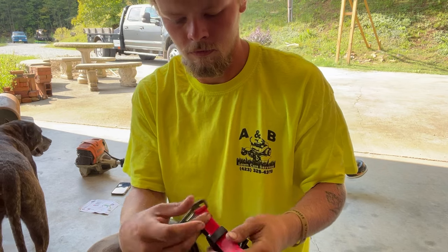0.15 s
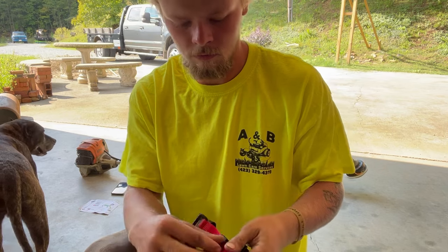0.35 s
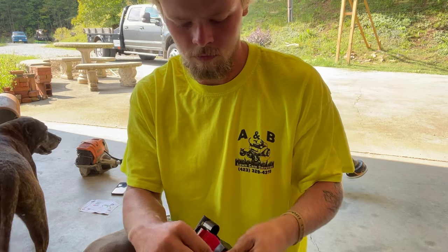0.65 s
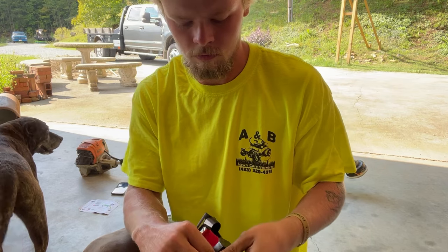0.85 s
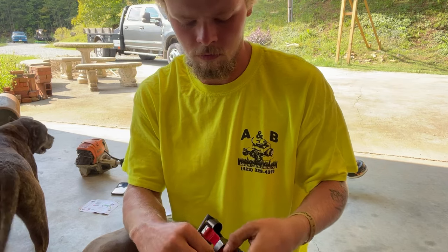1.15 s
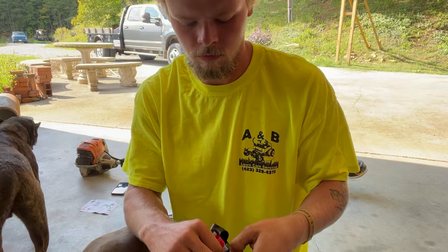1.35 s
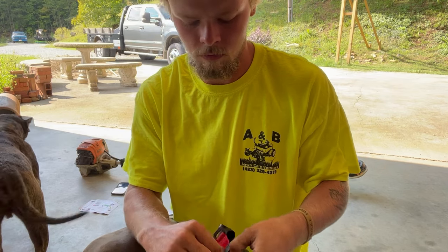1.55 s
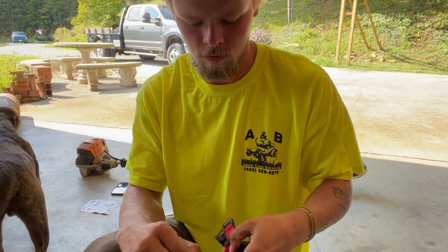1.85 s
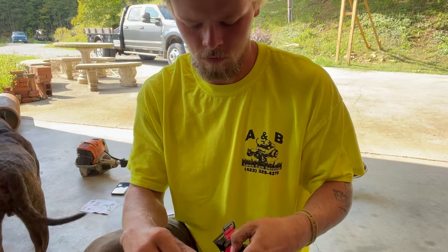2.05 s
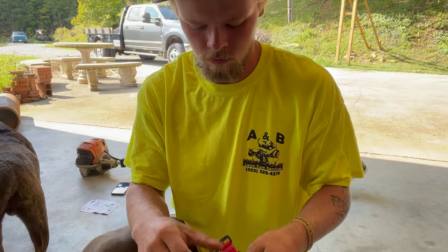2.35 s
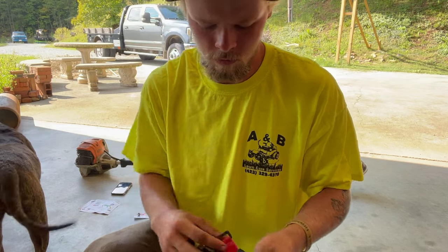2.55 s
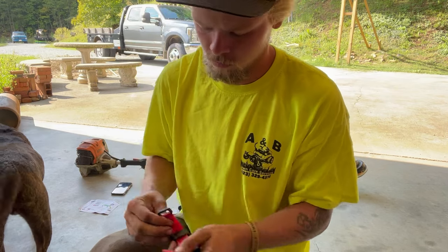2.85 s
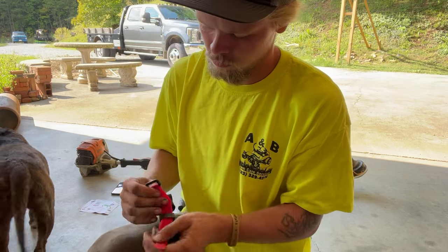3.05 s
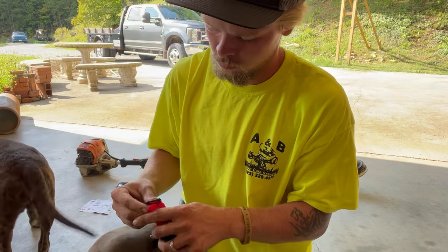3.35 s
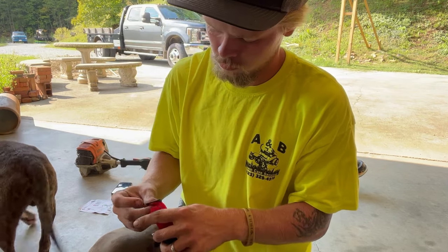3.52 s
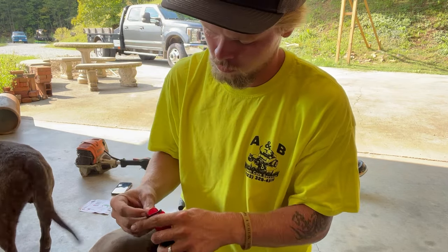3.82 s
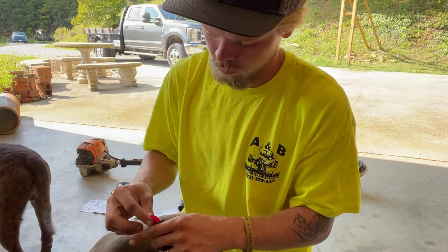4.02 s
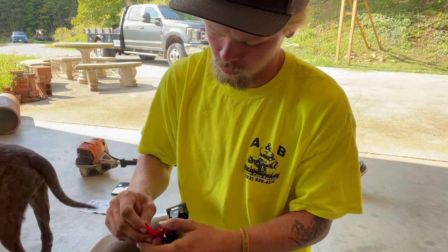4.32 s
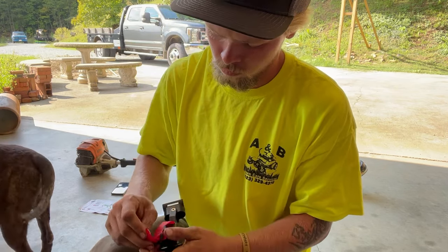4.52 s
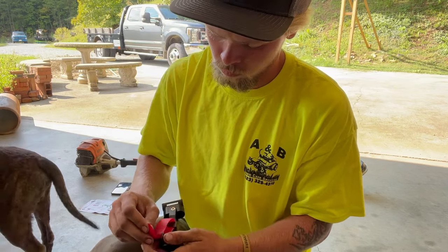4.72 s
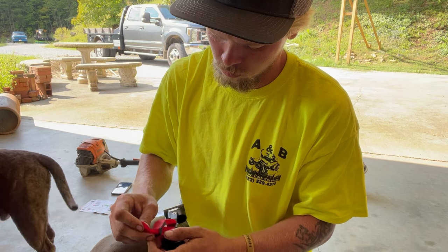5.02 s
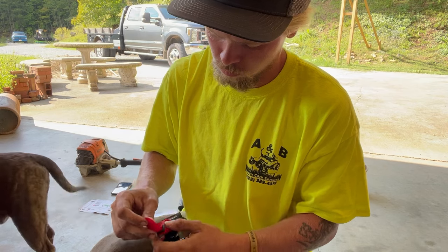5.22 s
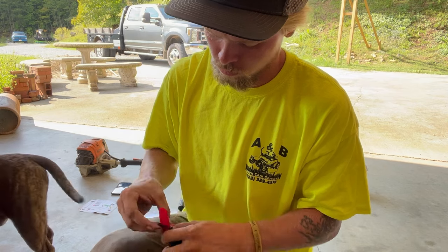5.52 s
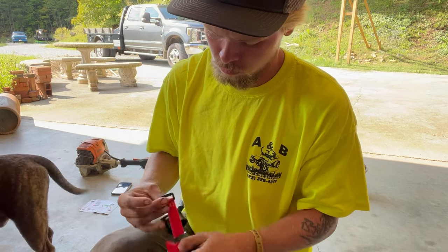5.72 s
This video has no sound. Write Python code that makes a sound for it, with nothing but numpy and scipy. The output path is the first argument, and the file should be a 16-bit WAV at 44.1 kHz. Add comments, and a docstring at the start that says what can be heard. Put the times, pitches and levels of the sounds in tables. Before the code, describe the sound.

Hands work a hook-and-loop strap through a plastic buckle about an arm's length from a phone microphone. Faint ticks and rubs come first, then a loud short rip with buckle rattle, a hard plastic click, softer rasps and a final crackling cluster. A low fan-like hum and faint hiss continue beneath in an open concrete garage.

```python
"""Open garage: hands thread a hook-and-loop strap through a plastic buckle, an arm's length from a two-port phone.
Hooks snap free singly (tick plus rattle) and in rips (dense noise bursts through webbing resonances).
The buckle knocks (decaying sine inside a noisy clack) and rings along during the long rip.
Fan and compressor hum and beat (steady cosines) over rumble and hiss (shaped noise); random echoes form the room."""
import sys
import numpy as np
from scipy import signal
from scipy.fft import rfft, irfft
from scipy.io import wavfile
from scipy.ndimage import uniform_filter1d, map_coordinates

SR = 44100
rng = np.random.default_rng(int(sys.argv[2]) if len(sys.argv) > 2 else 0)


def unload_audio(sound):
    """Save the sound as a 16-bit wav file, at the path given as the first command line argument."""
    columns = np.transpose(np.atleast_2d(sound))
    # keep every value between -1 and 1, then stretch to whole-number steps
    steps = np.round(np.clip(columns, -1, 1) * 32767)
    wavfile.write(sys.argv[1], SR, steps.astype(np.int16))


N = 259308

# Rumble and hiss spectrum: hz, density_db_per_hz, port_likeness (-1 to 1)
AIR_SPECTRUM = [(24, -104, 0.8), (34.2, -84, 0.97), (43, -75, .97), (80, -72.5, 0.68), (154, -77.5, 0.72),
                (392, -84.5, 0.057), (1380, -98.5, -.2), (1700, -94, -0.43), (1820, -102, -0.39),
                (2420, -99, -0.019), (4740, -89, -0.053), (6770, -89.5, -0.047), (7870, -90, 0.74),
                (9500, -98, 0.82), (10800, -104, 1), (12100, -105, 1), (15200, -122, 1)]
# Slow swell of the treble hiss: time_s, swell_db
HISS_SWELL = [(0, -2.5), (1.5, -2), (3, -0.7), (4.5, -1.56), (5.88, -0.8)]
# Hum lines: shaft_order, mains_order, left_rms_db, right_rms_db
HUM_LINES = [(1, 0, -61, -60), (2, 0, -61.5, -57), (3, 0, -52, -49.5), (0, 1, -54.5, -57),
             (1, 1, -66.5, -66), (2, 1, -66, -62.5), (0, 2, -75, -66.5), (-2, 2, -72, -67.5)]
# Left port lag as the hands shift: time_s, lag_us
LEFT_LAG = [(0, 147), (2.3, 87), (2.6, 35), (5.88, 14)]
# Buckle knocks, pitched by finger grip: start_s, peak_db, ring_hz, ring_share (0-1)
BUCKLE_KNOCKS = [(0.243, -46, 1300, 0.05), (1.606, -41, 1970, 0.5), (1.633, -39, 1980, 0.7),
                 (1.654, -28.5, 2030, 0.8), (1.7, -36, 2000, 0.8), (1.743, -35, 1150, 0.46),
                 (1.748, -37, 1110, .8), (1.753, -31, 1090, 1), (1.763, -36, 1020, 0.8),
                 (1.774, -27, 1160, 0.93), (1.889, -36, 1190, 0.45), (1.896, -31.5, 1450, 1),
                 (2.1415, -38, 1390, 0.77), (2.274, -40, 1630, 0.28), (2.317, -40.5, 1200, 0.34),
                 (2.681, -41, 2110, 0.4), (2.856, -37, 1700, 0.35), (2.88, -40, 1100, 0.1),
                 (2.8862, -28.5, 1700, 0.4), (2.8936, -27.5, 1050, 0.22), (2.896, -23.5, 1100, 0.2),
                 (2.9018, -31, 2000, 0.05), (2.978, -43, 950, 0.47), (3.005, -35, 530, 0.24),
                 (3.024, -40, 711, 0.4), (3.052, -40.5, 603, 0.3), (3.641, -41, 1020, 0.06),
                 (4.255, -34, 2460, 0.1), (4.276, -48, 1860, 0.4), (5.472, -34, 1660, 0.49),
                 (5.571, -38, 1000, .2), (5.576, -37, 900, 0.4), (5.582, -46, 786, .8),
                 (5.587, -38.5, 750, 1), (5.624, -36, 1220, 0.53), (5.628, -33.5, 486, 0.57),
                 (5.644, -25.5, 1480, 0.13), (5.647, -35, 2540, 0.2), (5.65, -34, 1800, 0)]
# Buckle resonances on the taut strap: hz, width_hz
TAUT_RESONANCES = [(400, 250), (1100, 260), (2050, 800)]
# Their levels during the long rip: time_s, low_db, middle_db, high_db
TAUT_LEVELS = [(1.645, -80, -80, -70), (1.654, -56, -60, -47), (1.68, -55, -58, -48), (1.70, -49, -54, -47),
               (1.73, -48, -52, -47), (1.755, -53, -48, -48), (1.776, -51, -50, -47),
               (1.785, -54, -70, -58), (1.83, -56, -75, -62), (1.88, -66, -80, -70), (1.92, -85, -90, -85)]
# Webbing resonances, one list each for bass, mid, treble: hz, width_hz, level_db
WEBBING_RESONANCES = [
    [(412, 300, 0.5), (1100, 1240, 3.5), (1970, 3100, 3.5)],
    [(3100, 2800, -8), (4780, 3200, 2.5), (6770, 4500, -3)],
    [(8330, 3400, 5), (10650, 2300, 4), (12530, 2160, 3.5), (13540, 890, -3)],
]
# Single hooks letting go: start_s, treble_peak_db, mid_minus_treble_db
HOOK_SNAPS = [(0.06, -39, -20), (0.1224, -32, -22), (0.247, -30, -8), (0.2846, -43.5, -13),
              (0.3168, -38, -4), (0.326, -34.5, -3), (0.6473, -48, -7), (0.7362, -49, -5), (0.757, -37, -5),
              (0.9495, -31.5, -16), (1.115, -27.5, -6), (1.1293, -41, -8), (1.2353, -33.5, -2),
              (1.2472, -35, 0), (1.2741, -37, -7), (1.2924, -29, -7), (1.303, -30.5, -2.5),
              (1.3347, -28.5, -9), (1.3374, -30, -12), (1.3517, -35, -1), (1.421, -30, -6), (1.43, -41, -7),
              (1.4425, -21, -2), (1.498, -39, -10), (1.507, -36, 8.5), (1.594, -37, -10), (1.5975, -22, -6),
              (1.604, -24, -5), (1.6055, -18, -4), (1.61, -27, -4), (1.632, -24, -2), (1.6422, -26, -5),
              (1.6528, -20, -5), (1.654, -15, -2), (1.657, -19, -4), (1.661, -21, -7), (1.667, -17, -3),
              (1.669, -18, -4), (1.6725, -20, -2), (1.676, -20, -4), (1.6808, -22, -3), (1.6865, -20, -2),
              (1.6955, -19, -2), (1.699, -18, -4), (1.718, -19, -2), (1.7245, -14, -5), (1.7315, -20, -1),
              (1.7388, -19, -3), (1.753, -14, -8), (1.7626, -25, -9), (1.7735, -16, -7), (1.889, -22, 0),
              (1.8955, -18.5, -1), (1.8985, -25, -14), (2.2712, -39, 7.5), (2.7216, -35, 2),
              (2.7819, -42, -7), (2.8603, -32.5, -7), (2.8815, -22, -18), (2.8923, -27, -12),
              (2.896, -31, 1), (2.9125, -37, 2), (3.002, -35, -12), (3.006, -33, -3), (3.0085, -30.5, 1.5),
              (3.0266, -37, -7), (3.1083, -42, -8), (3.3646, -33.5, -4), (3.6148, -35, -19),
              (3.641, -31, -14), (3.7758, -35, -10), (3.81, -39, -13), (3.841, -34, -10),
              (3.9312, -37, -13), (4.189, -33.5, -6), (4.259, -24.5, -2.5), (4.274, -26, -6.5),
              (4.295, -23.5, -12), (4.4778, -41, -1), (4.6382, -46, -1), (4.752, -39, -4),
              (4.9855, -45, 10.5), (5.0173, -38, -17), (5.1502, -42, -8), (5.1636, -35, -17),
              (5.25, -47, 9), (5.4648, -34, -12), (5.4716, -30, -5), (5.5704, -35, -3), (5.576, -33, -3),
              (5.5823, -23, -14), (5.5803, -33, -6), (5.5875, -26, -11), (5.5901, -20.5, -16),
              (5.591, -25, -15), (5.6043, -19.5, -18), (5.6, -30, -3), (5.611, -26, -2.5),
              (5.618, -28, -10), (5.6232, -28, -11), (5.626, -30, 2), (5.6312, -28, -10), (5.636, -30, -2)]
# Strap torn or rubbed: full_level_s, rise_s, hold_s, fall_s, treble_db, mid_minus_treble_db,
# bass_minus_treble_db, graininess_db
STRAP_STROKES = [(0.123, 0.26, .002, 0.34, -59.5, -16, -6.5, 4),
                 (0.24, 0.018, .002, 0.013, -51.5, -16, -0.5, 7),
                 (0.323, .06, .002, 0.031, -67, -7, 0, 6.5), (0.647, 0.057, .002, 0.017, -56.5, 0, -4.5, 8),
                 (0.755, 0.082, .002, 0.019, -52.5, 3.5, -2.5, 7), (0.94, .055, .004, 0.091, -58, 1, -7, 7),
                 (1.245, 0.043, 0.16, 0.19, -61, 1.5, -23, 6),
                 (1.604, 0.0063, 0.01, 0.025, -40.5, 8, -16, 7.5),
                 (1.653, 0.003, 0.124, .006, -32.5, 0, -14, 4.5),
                 (1.893, 0.0094, 0.0074, 0.0099, -39, 4, -3.5, 4.5),
                 (2.04, .05, .002, .03, -65, 11.5, -10, 5), (2.24, .02, 0.064, .03, -60.5, -3, -9, 8),
                 (2.797, .03, .002, 0.093, -64.5, 1, 1.5, 8),
                 (2.887, 0.037, .002, 0.032, -48, -1, 4.5, 8.5),
                 (3.005, 0.017, 0.004, 0.043, -44.5, -7, -4, 7), (3.06, .03, 0.047, .03, -56, -4, -7.5, 4),
                 (3.17, .08, .002, 0.11, -53, -10, -13, -1),
                 (3.361, 0.038, .002, 0.012, -59.5, 6.5, 0.5, 10), (3.638, 0.04, .008, .07, -64, -8, 0, 9),
                 (3.752, .05, 0.058, .03, -65, -7, -7, 8), (3.847, 0.033, 0.0018, 0.015, -59, -9, 6, 2),
                 (3.934, 0.092, .002, .035, -58, -14, -7, 7), (4.044, .03, 0.043, 0.09, -51.5, -5, -10, 1),
                 (4.194, .015, .01, 0.046, -52.5, -6, -15, 2),
                 (4.256, 0.026, 0.049, 0.032, -54.5, -4.5, -1, 9),
                 (4.675, 0.037, 0.047, .03, -47, -14, -22, 1),
                 (4.737, 0.042, 0.028, 0.02, -44.5, -5.5, -21, -3),
                 (5.15, 0.022, .004, 0.4, -57, -7, -8.5, 11),
                 (5.474, 0.015, 0.0018, 0.012, -52.5, 5, 9.5, 3.5),
                 (5.571, .008, 0.012, 0.016, -47, -7, -4, 2.5),
                 (5.591, 0.016, 0.038, 0.034, -41.5, -4.5, -8, 2),
                 (5.783, 0.16, .002, 0.034, -62.5, -13, -1, 7)]

SHAFT_HZ, MAINS_HZ, PUMP_HZ, PUMP_RMS_DB = 42.76, 119.84, 59.09, -57
IN_STEP_S = 0.048  # all hum lines crest together here
GARAGE_T60_S, GARAGE_DB = 0.33, -9
SCATTER_T60_S, SCATTER_DB, ECHO_PATTERNS, WEIGHT_STEPS_PER_S = 0.008, -10, 4, 40
KNOCK_T60_S, LOOSE_EXTRA_T60_S = 0.011, 0.008  # a loose grip rings longer
GRIT_DB, CLACK_WIDTH_RATIO = -24, 2.5
TUGS_PER_S, TUG_SIZE_DB = 1500, 1.5
# faint hooks at random moments
STRAYS_PER_S, STRAY_MIN_DB, STRAY_SCATTER_DB, STRAY_MID_DB = 14, -48, 2.5, -3
TICK_DECAY_S, RATTLE_DB, RATTLE_T60_S = 0.0001, -21, 0.011
# stronger, longer rattle while the strap is torn open
TORN_START_S, TORN_END_S = 1.59, 1.79
BUNCH_MID_DB, BUNCH_TREBLE_DB, BUNCH_T60_S = -7, -14, 0.014
TUNE_SCATTER_DB = 0.5  # each snap finds the webbing bent a little differently
SNAP_TOP_HZ, SNAP_TOP_WIDTH_HZ, SNAP_TOP_DB = 14050, 1700, 0.89
HOOKS_PER_S, HOOK_T30_S, SHARED_SIZE = 4000, 0.0009, 0.7
EDGE_DB = 20  # level change over each rise and fall
AFTER_DB, AFTER_S = -16.5, 0.15  # crackle after a stroke: start level, time to drop EDGE_DB
DULL_BELOW_DB, DULL_DB_PER_DB, DULL_MIN_DB, DULL_HZ = -38, 4.5, -4, 12000  # soft strokes lose top
PORT_SPLIT_HZ, PORT_ALIGN_HZ, PORT_DELAY_S, BALANCE_DB = 7200, 11250, 155e-6, -1.7
TOP_HZ = 16100


def undb(db):
    """Amplitude factor from dB."""
    return 10 ** (np.asarray(db) / 20)


def unit(x):
    """Scale to rms 1."""
    return x / np.sqrt(np.mean(x ** 2))


def band(x, hz, width_hz):
    """Resonance applied twice, for steep skirts; width is per pass."""
    b, a = signal.iirpeak(hz, hz / width_hz, fs=SR)
    return signal.lfilter(b, a, signal.lfilter(b, a, x))


def ring_down(t, t60_s):
    """Exponential decay, down to 1/1000 at t60_s."""
    return np.exp(-np.log(1000) * t / t60_s)


def fade(x, fall_s):
    """Smear with an exponential tail that falls to 1/1000 in fall_s."""
    return signal.lfilter([1], [1, -ring_down(1 / SR, fall_s)], x)


def walk(rate_hz):
    """Random levels held 1 / rate_hz seconds, smoothed twice and scaled by 0.15."""
    k = int(SR / rate_hz)
    steps = np.repeat(rng.standard_normal(N // k + 1), k)
    return 0.15 * uniform_filter1d(uniform_filter1d(steps, k), k)[:N]


def air():
    """Machine rumble, alike at both ports, and a smooth treble hiss that swells slowly."""
    hz, density_db, likeness = np.transpose(AIR_SPECTRUM)
    log_f = np.log(np.fft.rfftfreq(N, 1 / SR) + 1)
    gain = undb(np.interp(log_f, np.log(hz), density_db, left=-130)) * np.sqrt(SR / 2)
    c = np.clip(np.interp(log_f, np.log(hz), likeness), -0.9, 1)
    # shared and opposed parts set the correlation of the ports
    mid, side = rfft(rng.standard_normal((2, N))) * gain * np.sqrt([(1 + c) / 2, (1 - c) / 2])
    pair = np.array([mid + side, mid - side])
    treble = 1 / (1 + (2500 / np.exp(log_f)) ** 6)
    swell_db = np.interp(np.arange(N) / SR, *np.transpose(HISS_SWELL)) + 0.41 * walk(2.7)
    return irfft(pair * (1 - treble), N) + undb(swell_db) * irfft(pair * treble, N)


def hum():
    """Compressor tone, fan shaft orders, mains buzz and sums; third order beats with buzz at 8.4 Hz."""
    t = np.arange(N) / SR - IN_STEP_S
    out = undb([[PUMP_RMS_DB], [PUMP_RMS_DB]]) * np.cos(2 * np.pi * PUMP_HZ * t)
    for shaft, mains, *port_db in HUM_LINES:
        waver = undb(0.59 * walk(1.2) * (shaft != 0))
        line_hz = shaft * SHAFT_HZ + mains * MAINS_HZ
        out = out + undb(port_db)[:, None] * waver * np.cos(2 * np.pi * line_hz * t)
    return np.sqrt(2) * out  # rms to peak


def echoes(x, t60_s, db):
    """Random reflections dying away, unrelated at each port."""
    t = np.arange(int(2 * t60_s * SR)) / SR
    echo = rng.standard_normal((2, len(t))) * ring_down(t, t60_s) * (t > 0.0005)
    echo = undb(db) * echo / np.sqrt(np.sum(echo ** 2, axis=1, keepdims=True))
    return signal.fftconvolve(x[None], echo)[:, :N]


def garage(x):
    """Quick diffuse scatter, random echo patterns blended by drifting weights, then the concrete bay's tail."""
    weights = np.array([walk(WEIGHT_STEPS_PER_S) for _ in range(ECHO_PATTERNS)])
    weights /= np.sqrt(np.sum(weights ** 2, axis=0))
    scatter = sum(echoes(x * w, SCATTER_T60_S, SCATTER_DB) for w in weights)
    return scatter + echoes(x, GARAGE_T60_S, GARAGE_DB)


def knocks():
    """Hollow plastic: a short dull ring inside a wide clack; a loose grip lets the ring through."""
    out, t = np.zeros(N + 4000), np.arange(4000) / SR
    noises = rng.standard_normal((len(BUCKLE_KNOCKS), 4000))
    for (start_s, peak_db, hz, share), noise in zip(BUCKLE_KNOCKS, noises):
        decay = ring_down(t, KNOCK_T60_S + LOOSE_EXTRA_T60_S * share)
        push = (t == 0) + undb(GRIT_DB) * noise * decay
        clack = band(push, hz, CLACK_WIDTH_RATIO * hz)
        share = np.clip(share, 0, 1)
        ring = np.sin(2 * np.pi * hz * t) * decay * (1 - np.exp(-t / 0.00016))
        hit = share * ring + (1 - share) * clack / abs(clack).max()
        i = int(start_s * SR)
        out[i:i + 4000] += undb(peak_db) * hit / abs(hit).max()
    return out[:N]


def taut():
    """Uneven tugs of the tearing hooks shake the buckle resonances."""
    t, (time_s, *levels) = np.arange(N) / SR, np.transpose(TAUT_LEVELS)
    out = 0
    for (hz, width_hz), level_db in zip(TAUT_RESONANCES, levels):
        tugs = (rng.random(N) < TUGS_PER_S / SR) * rng.standard_normal(N)
        tugs = tugs * undb(TUG_SIZE_DB * rng.exponential(size=N))
        level = undb(np.interp(t, time_s, level_db, left=-120, right=-120))
        out = out + level * unit(band(tugs, hz, width_hz))
    return out


def strays():
    """Extra snap rows at random moments, with exponentially scattered dB levels."""
    place, size = rng.random((int(STRAYS_PER_S * N / SR), 2)).T
    peak_db = STRAY_MIN_DB - STRAY_SCATTER_DB * np.log(1 - size)
    return [(s, db, STRAY_MID_DB) for s, db in zip(place * N / SR, peak_db)]


def strike(push, modes, noise):
    """Shake slightly detuned resonances of alternating sign; peak 1."""
    out = 0
    for k, (hz, width_hz, db) in enumerate(modes):
        bent_hz = hz * undb(TUNE_SCATTER_DB * noise[-1 - k])
        out = out + undb(db) * band(push, bent_hz, width_hz) * (-1) ** k
    return out / abs(out).max()


def snaps():
    """Each freed hook gives a needle-sharp tick and a weaker rattle, in treble and mid."""
    out, t = np.zeros(N + 4000), np.arange(4000) / SR
    rows = list(HOOK_SNAPS) + strays()
    # a single hook reaches higher than the webbing rings
    treble_modes = WEBBING_RESONANCES[2][:-1] + [(SNAP_TOP_HZ, SNAP_TOP_WIDTH_HZ, SNAP_TOP_DB)]
    for (start_s, peak_db, mid_db), noise in zip(rows, rng.standard_normal((len(rows), 4000))):
        tick = (t == 0) + 0.2 * noise * np.exp(-t / TICK_DECAY_S)
        mid_rattle_db, treble_rattle_db, t60_s = RATTLE_DB, RATTLE_DB, RATTLE_T60_S
        if TORN_START_S < start_s < TORN_END_S:
            mid_rattle_db, treble_rattle_db, t60_s = BUNCH_MID_DB, BUNCH_TREBLE_DB, BUNCH_T60_S
        rattle = noise * ring_down(t, t60_s)
        mid = strike(tick + undb(mid_rattle_db) * rattle, WEBBING_RESONANCES[1], noise)
        treble = strike(tick + undb(treble_rattle_db) * rattle, treble_modes, noise)
        i = int(start_s * SR)
        out[i:i + 4000] += undb(peak_db) * (treble + undb(mid_db) * mid)
    return out[:N]


def rips():
    """Dense hook releases of very uneven size; each shakes the webbing resonances in its own way."""
    t, power, grain_db = np.arange(N) / SR, np.zeros((3, N)), np.zeros(N)
    for full_s, rise_s, hold_s, fall_s, treble_db, mid_db, bass_db, grain in STRAP_STROKES:
        early = full_s - t
        late = t - full_s - max(hold_s, 0)
        slope = np.maximum(early / max(rise_s, 0.002), late / max(fall_s, 0.002))
        shape_db = -EDGE_DB * np.maximum(slope, 0)
        # loosened hooks crackle on; doubled dB gives power
        after = (late > 0) * undb(2 * (AFTER_DB - EDGE_DB * late.clip(0) / AFTER_S))
        band_db = np.array([[treble_db + bass_db], [treble_db + mid_db], [treble_db]])
        stroke = undb(2 * band_db) * (undb(2 * shape_db) + after)
        power += stroke
        grain_db += np.clip(grain, 0, 7) * stroke[2]
    grain_db /= power[2] + 1e-30
    level_db = 10 * np.log10(power[2] + 1e-30)
    dull_db = np.clip(DULL_DB_PER_DB * (level_db - DULL_BELOW_DB), DULL_MIN_DB, 0)
    hooks = rng.random(N) < HOOKS_PER_S / SR
    common, out = rng.exponential(size=N), 0
    for gain, modes in zip(np.sqrt(power), WEBBING_RESONANCES):
        part = 0
        for hz, width_hz, db in modes:
            size = SHARED_SIZE * common + (1 - SHARED_SIZE) * rng.exponential(size=N)
            size_db = grain_db * np.minimum(size, 3)
            burst = np.sqrt(fade(hooks * undb(2 * size_db), HOOK_T30_S))  # fades as power
            burst /= np.sqrt(uniform_filter1d(burst ** 2, size=4000)) + 1e-9
            ring = unit(band(burst * rng.standard_normal(N), hz, width_hz))
            part = part + undb(db + dull_db * (hz > DULL_HZ)) * ring
        out = out + gain * part / np.sqrt(np.sum(undb(np.array(modes)[:, 2]) ** 2))
    return out


def scene():
    """Below the port split the strap reaches the left port late; room, air and hum are added."""
    strap = rips() + snaps() + knocks() + taut()
    n = np.arange(N)
    sos = signal.butter(6, PORT_SPLIT_HZ, fs=SR, output="sos")
    low = signal.sosfiltfilt(sos, strap)
    lag_samples = np.interp(n / SR, *np.transpose(LEFT_LAG)) * SR / 1e6
    left_low = map_coordinates(low, [n - lag_samples], order=3)
    near = np.array([left_low, low]) + strap - low
    balance = undb([[BALANCE_DB / 2], [-BALANCE_DB / 2]])
    return balance * (near + garage(strap) + air()) + hum()


def record(dry):
    """Above the split the treble phases of left and right turn apart linearly; balance evens out, top is cut."""
    f = np.fft.rfftfreq(N, 1 / SR)
    onset = np.clip((f - PORT_SPLIT_HZ) / 800 + 0.5, 0, 1)
    turn = np.pi * (f - PORT_ALIGN_HZ) * PORT_DELAY_S * onset  # half the delay on each side
    even = undb(-BALANCE_DB / 2 * np.clip((f - PORT_SPLIT_HZ) / 2500, 0, 1))
    ports = np.array([even, 1 / even]) * np.exp(1j * np.array([turn, -turn]))
    wet = irfft(rfft(dry) * ports, N)
    return signal.sosfilt(signal.ellip(10, 0.2, 80, TOP_HZ, fs=SR, output="sos"), wet)


dry = scene()
out = record(dry)
unload_audio(out)
```